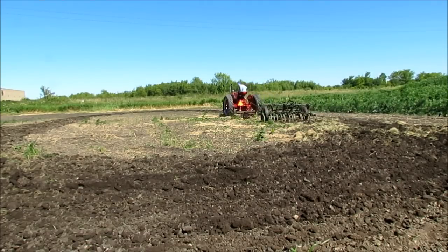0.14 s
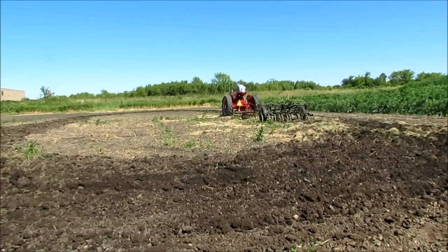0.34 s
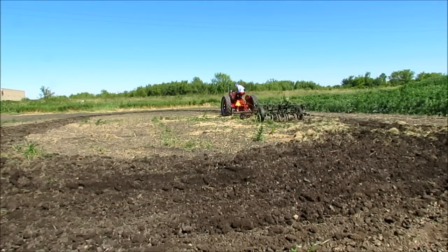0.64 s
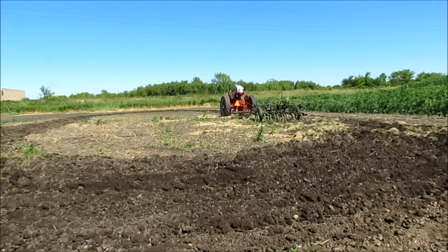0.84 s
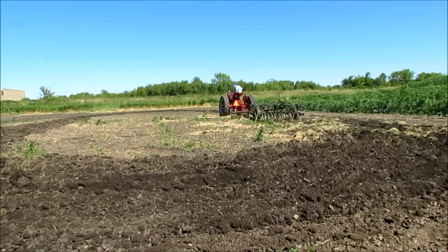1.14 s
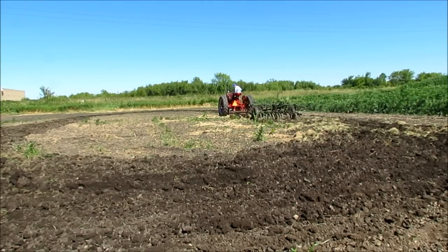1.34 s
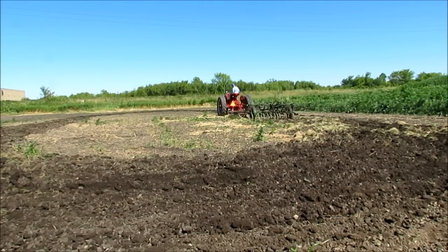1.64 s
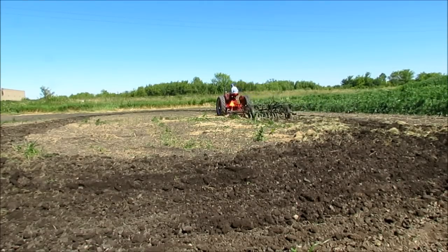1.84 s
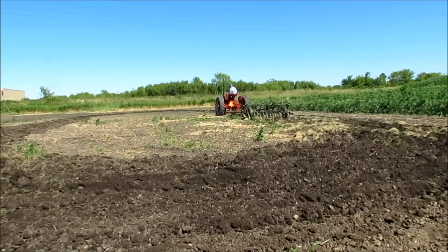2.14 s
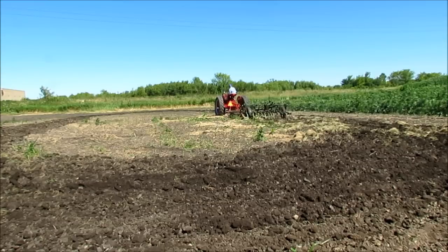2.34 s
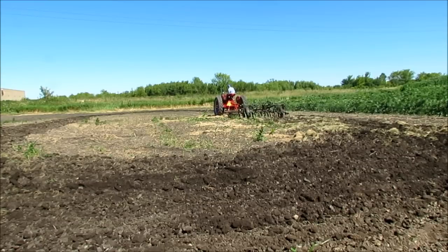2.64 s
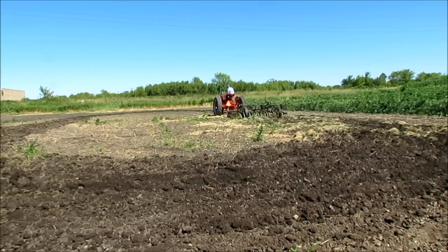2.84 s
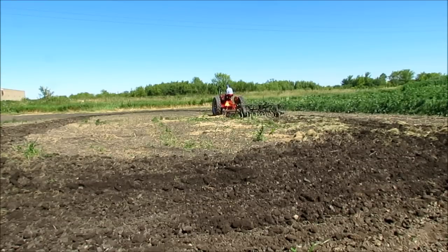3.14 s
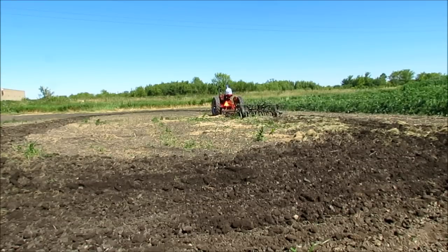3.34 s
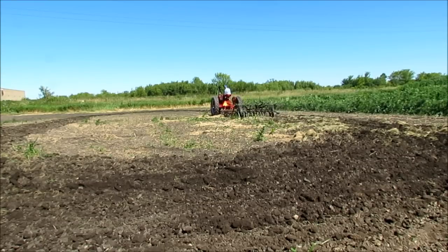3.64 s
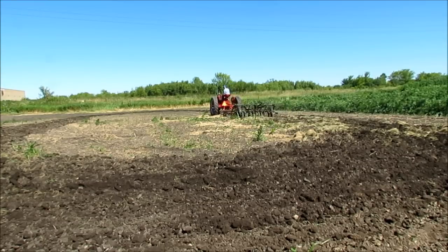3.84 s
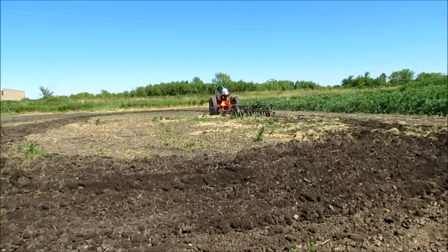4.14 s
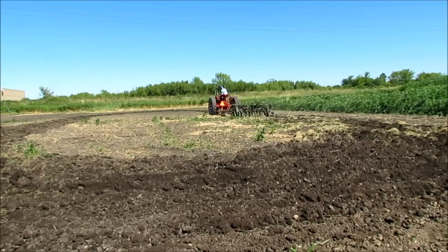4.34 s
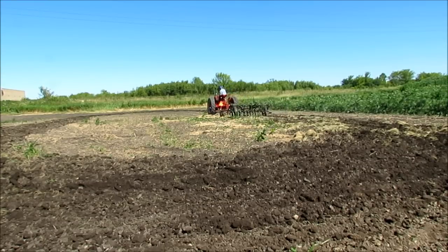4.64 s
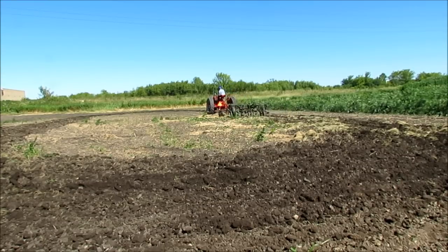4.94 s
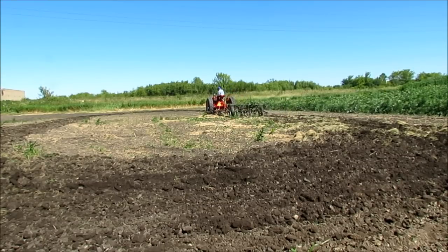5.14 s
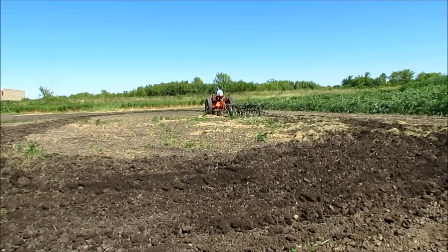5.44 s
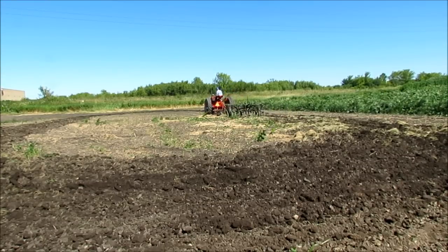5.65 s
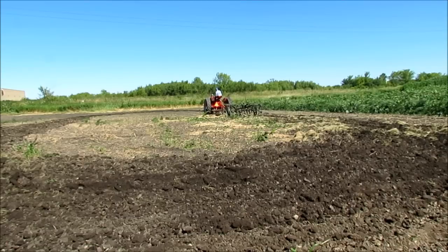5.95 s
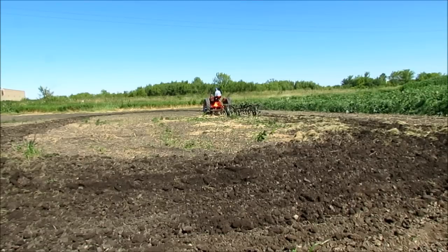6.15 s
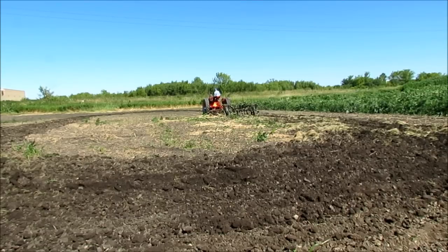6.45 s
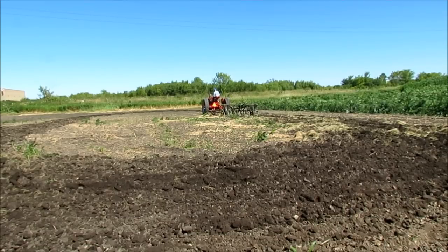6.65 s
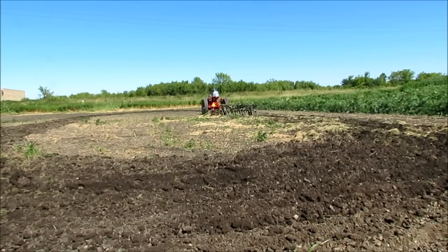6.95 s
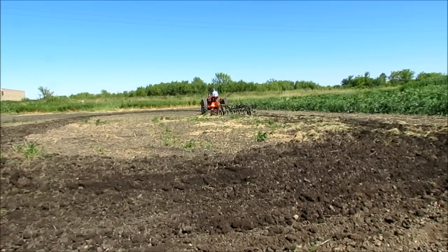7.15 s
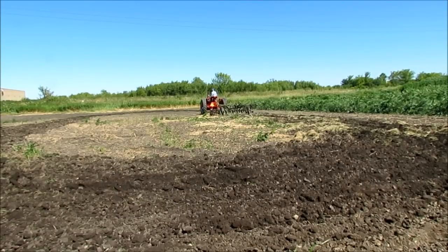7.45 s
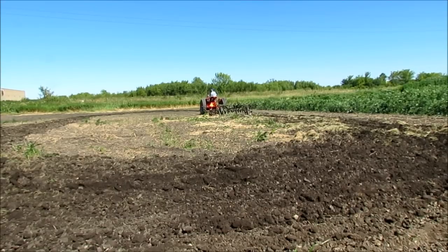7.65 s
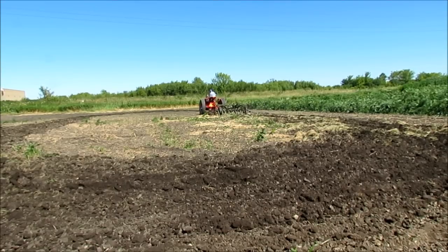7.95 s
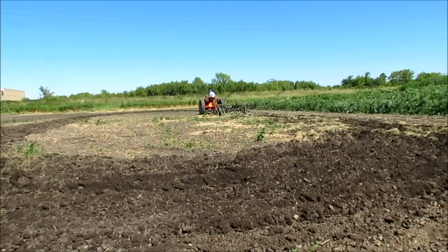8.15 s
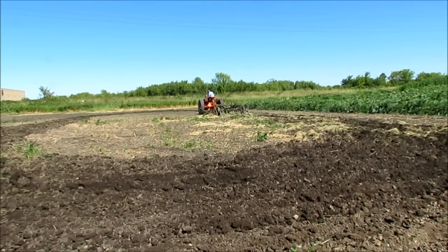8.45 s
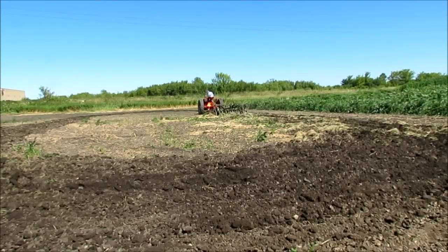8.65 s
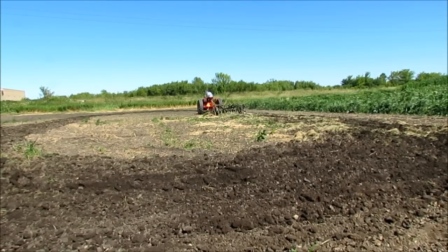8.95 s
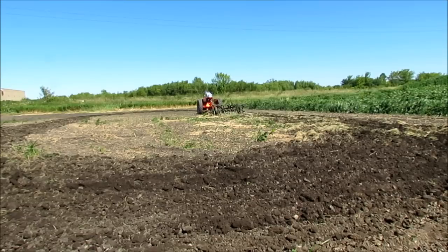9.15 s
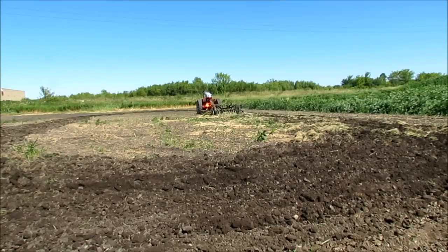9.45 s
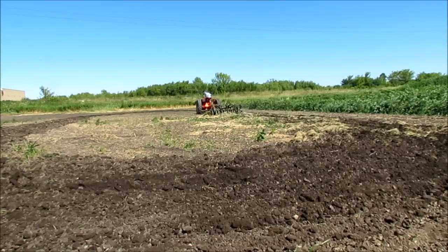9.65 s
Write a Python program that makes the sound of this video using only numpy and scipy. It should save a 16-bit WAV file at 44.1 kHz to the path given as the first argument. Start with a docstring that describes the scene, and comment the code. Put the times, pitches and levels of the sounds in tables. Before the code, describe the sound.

Continuous rapid chug of an old tractor dragging a harrow over soil, heard outdoors from afar. The exhaust is dry, noisy and hissy, slightly uneven from cylinder to cylinder, its pitch wavering a little under the load. Level and brightness flutter with the wind, with a hollow drifting colour. Low wind rumble and lumpy buffets strike the exposed microphone, returning more densely after six seconds.

```python
"""Tractor harrowing a field

An old four-cylinder tractor pulls a harrow across a field, far from a small microphone. Some forty firings
a second each spit a burst of turbulent gas, synthesized as fresh noise rung through an open exhaust stack.
A delayed, inverted copy off the soil combs the blasts with drifting notches. Sines at low orders of the
shaft throb beneath over a soft rumble, and shaped noise in irregular lumps makes gusts buffet the microphone."""
import sys
import numpy as np
from scipy.fft import rfft, irfft, next_fast_len
from scipy.io import wavfile
from scipy.ndimage import uniform_filter1d, map_coordinates

SR = 44100
rng = np.random.default_rng(int(sys.argv[2]) if len(sys.argv) > 2 else 0)


def waveform_to_disk(signal):
    """Save audio, clipped to [-1, 1], as 16-bit WAV at the path in sys.argv[1]."""
    frames = np.transpose(np.atleast_2d(signal))
    scaled = np.clip(frames, -1, 1) * 32767
    samples = np.round(scaled).astype(np.int16)
    wavfile.write(sys.argv[1], SR, samples)


N = 432621
ROW, LEAD = 2048, 512  # samples for one blast, and before its nominal firing time


def amp(db):
    """Decibel law: the amplitude gain of a level in dB."""
    return 10 ** (np.asarray(db) / 20)


def unit(x):
    """Normalization by power: x at rms 1."""
    return x / np.sqrt(np.mean(x ** 2) + 1e-20)


def along(points, hz):
    """Logarithmic frequency scale: (Hz, value) points interpolated on a log axis."""
    f, v = np.transpose(points)
    return np.interp(np.log(hz + 1), np.log(f + 1), v)


def curves(rows, t):
    """Linear interpolation: each column after the time, read at times t."""
    s, *columns = np.transpose(rows)
    return np.array([np.interp(t, s, column) for column in columns])


def wobble(rate):
    """Band-limited chance: a smooth random curve through rate knots a second."""
    knots = rng.standard_normal(int(N * rate / SR) + 4)
    return map_coordinates(knots, [np.arange(N) * rate / SR])


def filtered(x, response):
    """Linear filtering: the spectrum of x times a response of frequency."""
    m = next_fast_len(N + 8192)
    return irfft(rfft(x, m) * response(np.fft.rfftfreq(m, 1 / SR)), m)[..., :N]


def swell(ms, rise_db, fall_db):
    """Exponential growth and decay: climbs rise_db each ms before 0 and sinks fall_db each ms after."""
    before = amp(np.clip(-rise_db * ms, -200, 200))
    after = amp(np.clip(fall_db * ms, -200, 200))
    return 1 / (before + after)


def causal(db):
    """Minimum phase: gains in dB given the phase that rings only after the blow; amp makes them responses."""
    cepstrum = irfft(db)
    fold = 1 + np.sign(ROW // 2 - np.arange(ROW))
    fold[0] = 1
    return rfft(cepstrum * fold)


# engine speed, as the governor hunts under the changing pull: (time [s], firing rate [1/s])
ENGINE_SPEED = [(0.0, 40.81), (0.68, 40.77), (1.15, 39.22), (1.26, 40.05), (2.1, 40.98), (2.2, 40.05),
                (2.95, 39.88), (3.18, 40.71), (3.55, 41.01), (3.75, 40.47), (4.95, 40.72), (4.97, 41.88),
                (5.9, 41.8), (6.2, 40.5), (6.5, 40.96), (7.02, 39.66), (7.26, 39.58), (7.87, 40.75),
                (8.38, 38.98), (8.89, 41.15), (9.26, 39.89), (9.81, 39.35)]


def firings(t):
    """Phase as the integral of rate: firings so far at each sample time t."""
    first_turn = .199  # share of a firing interval already gone at the start
    return first_turn + np.cumsum(curves(ENGINE_SPEED, t)[0]) / SR


# blasts as moving air lets them arrive, before the exhaust's final gain:
# (time [s], bark level [dB], sizzle level [dB])
ARRIVAL_LEVELS = [(0.0, -29, -34), (0.14, -26, -28.5), (0.66, -26.5, -28.5), (0.88, -28.5, -30.5),
                  (1.15, -26, -27.5), (1.75, -26.5, -33.5), (1.88, -28.5, -35.5), (2.02, -25.5, -31.5),
                  (2.57, -27.5, -31.5), (2.72, -33, -40.5), (2.82, -28.5, -28.5), (2.97, -29.5, -35.5),
                  (3.1, -24, -31), (3.34, -28, -35), (3.54, -26.5, -27), (3.81, -26.5, -29.5),
                  (3.98, -34, -36), (4.15, -32.5, -37), (4.3, -29, -28), (4.89, -29, -34.5),
                  (5.04, -26, -26), (5.4, -29.5, -36.5), (5.7, -27.5, -27), (5.82, -31.5, -36),
                  (5.97, -28.5, -31), (6.09, -28, -39.5), (6.21, -24, -27), (6.51, -25, -32.5),
                  (6.72, -26, -28), (6.9, -24, -31), (7.1, -28.5, -32.5), (7.46, -26, -27.5),
                  (7.86, -26.5, -33.5), (7.98, -32, -37), (8.1, -29.5, -28.5), (8.27, -26, -32),
                  (8.48, -22.5, -27.5), (8.73, -28.5, -32.5), (9.1, -30, -34.5), (9.35, -23, -30.5),
                  (9.48, -29, -34.5), (9.7, -25.5, -28.5), (9.81, -27.5, -31)]
# centres of growl, bark and sizzle: (frequency [Hz])
VOICE_CENTRES = [745, 2390, 6850]
# firings that crack out of the row, offsets from the arrival curves before the cylinder trims:
# (time [s], bark offset [dB], sizzle offset [dB], centre of the brightened band [Hz])
CRACKING_FIRINGS = [(0.093, 5.5, 1, 12440), (0.387, 5, 4, 10600), (0.93, 1, -1.5, 5900),
                    (1.08, 0, 1.5, 8500), (1.157, 10, -2, 6950), (1.183, 9, -2, 5930), (1.555, -3, 6, 9600),
                    (1.754, -1, 7, 6900), (2.023, 6, 6, 11800), (2.071, 7, 1, 8100), (2.146, 3, 4.5, 11900),
                    (2.32, 3, 3.5, 6800), (2.619, 7, 0.5, 8000), (2.821, 2.5, 1, 10000),
                    (3.095, -4, 4.5, 11500), (3.512, 6.5, 1, 7400), (3.537, -3, 7, 11380),
                    (3.832, 4.5, 7, 11600), (4.3, 8, -4.5, 12400), (4.424, 4, -1, 8000),
                    (4.498, 1, 4.5, 12400), (4.744, 2, 7, 6200), (5.061, 2, -4, 7950),
                    (5.275, 3, 2.5, 7600), (5.706, 2, 1, 7400), (5.729, -4, 4.5, 4300), (5.992, 7, 4, 5500),
                    (6.385, -2, 4, 4750), (6.41, -2, 1, 8300), (6.704, 0.5, 7, 11200), (6.728, 1, 4, 8250),
                    (6.903, -1, 6.5, 12300), (6.928, 1, 1, 5650), (7.483, -3, 4.5, 9050),
                    (7.68, 8, 0, 8150), (7.706, 3, 3, 7300), (7.73, 1, 4.5, 6070), (7.878, -1, 11.5, 10000),
                    (7.903, -4, 7, 9900), (8.101, 0.9, 1.5, 9900), (8.277, 4.5, -1, 5900),
                    (8.583, -5, 5, 10300), (8.683, -12, 6.5, 10300), (9.35, 2.5, 1, 8050)]


def blast_voices(when, growl_trim_db, sizzle_trim_db, luck, hz):
    """Spectral envelope: each firing's balance of growl, bark and sizzle, in dB over frequency."""
    growl_mean_db, growl_follows = -33, 0.85  # share of the bark's swings that the growl follows
    flicker_db, flicker_rate = (0.2, 1.5), 7  # quicker chance swings of bark and sizzle; knots per s
    s = np.arange(N) / SR
    flicker = [db * np.interp(when, s, wobble(flicker_rate)) for db in flicker_db]
    bark_db, sizzle_db = curves(ARRIVAL_LEVELS, when) + flicker
    growl_db = growl_mean_db + growl_follows * (bark_db - bark_db.mean())
    level_db = np.transpose([growl_db, bark_db, sizzle_db]) + luck * [1.2, .8, 1.2]
    whistle_db = np.zeros((len(when), len(hz)))
    for t, bark_offset_db, sizzle_offset_db, bright_hz in CRACKING_FIRINGS:
        k = np.argmin(abs(when - t))
        level_db[k] = [growl_db[k] - 2, bark_db[k] + bark_offset_db, sizzle_db[k] + sizzle_offset_db]
        whistle_db[k] = 6 * np.exp(-((hz - bright_hz) / 900) ** 2)
    level_db += np.hstack([growl_trim_db, 0 * growl_trim_db, sizzle_trim_db])
    return np.array([along(list(zip(VOICE_CENTRES, row)), hz) for row in level_db]) + whistle_db


# resonances of the exhaust stack: (centre [Hz], width [Hz], relative peak level [dB])
STACK_RESONANCES = [(587, 56, 4.5), (713, 64, -2), (996, 58, -3.5), (1136, 94, 1), (1482, 41, 1),
                    (1744, 105, 4), (2220, 230, -2.5), (2750, 670, 3.5)]
# spectrum of the gas jet, relative, lowered 3 dB in use: (frequency [Hz], level per Hz [dB])
JET_SPECTRUM = [(200, -38), (500, -23), (820, -1.5), (1000, -2.5), (2000, 4.5), (4400, 0), (8700, 0),
                (11200, -7), (14500, -21.5), (16500, -70)]


def stack_and_jet(hz):
    """Resonance: pipe modes ring each blast, and their power adds to that of the broadband jet."""
    pipe = sum(amp(db) * 1j * hz * width / (centre * centre - hz * hz + 1j * hz * width)
               for centre, width, db in STACK_RESONANCES)
    jet = amp(along(JET_SPECTRUM, hz) - 3.0)
    return amp(causal(10 * np.log10(abs(pipe) ** 2 + jet ** 2)))


# the copy off the soil, bent by warm air and wind: (time [s], lag [ms])
SOIL_LAG = [(0.0, .435), (1.75, .445), (2.1, .315), (2.45, .458), (2.8, .478), (3.15, .384), (3.5, .348),
            (3.85, .191), (4.2, .236), (4.72, .247), (5.2, .425), (5.78, .38), (6.12, .25), (6.35, .305),
            (7.05, .278), (7.4, .41), (7.87, .317), (8.4, .138), (8.6, .27), (9.8, .31)]


def soil_reflection(when, hz):
    """Comb interference: soft ground inverts the copy, so notches sit at whole multiples of 1 / lag."""
    lag_ms = curves(SOIL_LAG, when).T
    strength = .68 / (1 + (hz / 5500) ** 2)  # rough soil scatters the treble
    return 1 - strength * np.exp(-2j * np.pi * hz * lag_ms / 1000)


# likeness of the two sides: (frequency [Hz], left-right correlation [1])
SIDE_LIKENESS = [(300, .9), (1400, .92), (3100, .83), (6800, .88), (11000, .95), (15000, .98)]
# balance of the two sides: (frequency [Hz], left over right [dB])
SIDE_BALANCE = [(300, -1.5), (1300, -2.5), (2400, -3), (4400, 1.5), (8000, -1.4), (15000, -1)]


def left_and_right(mid, side, hz):
    """Interaural coherence: two independent noises mixed to a set likeness and balance."""
    turn = np.arccos(np.clip(along(SIDE_LIKENESS, hz), -1, 1)) / 2
    mid, side = mid * np.cos(turn), side * np.sin(turn)
    lean = amp(along(SIDE_BALANCE, hz) / 2)
    return [irfft((mid + side) * lean), irfft((mid - side) / lean)]


# cylinders in firing order: (delay [ms], growl trim [dB], sizzle trim [dB], bark hold [ms])
CYLINDER_TRIMS = [(-3.7, -.4, 2.6, .8), (-2.7, .6, -1.6, 3), (-3.9, -1.8, .6, .5), (-2.7, 1, -1.6, 3)]


def exhaust():
    """Source and filter: one burst of fresh noise per firing, rung by the stack, heard straight and off soil."""
    s = np.arange(N) / SR
    turns = firings(s)
    n = np.arange(int(turns[-1]) + 1)
    when = np.interp(n, turns, s)
    delay_ms, growl_db, sizzle_db, hold_ms = np.array(CYLINDER_TRIMS)[n % len(CYLINDER_TRIMS)].T[..., None]
    hz = np.fft.rfftfreq(ROW, 1 / SR)
    luck = rng.standard_normal((len(n), 5))
    voice_db = blast_voices(when, growl_db, sizzle_db, luck[:, :3], hz)
    # eddies in the jet favour narrow bands, new ones in each blast, more so in the treble
    blotch = causal(unit(uniform_filter1d(rng.standard_normal(voice_db.shape), size=34, axis=1)))
    colour = soil_reflection(when, hz) * stack_and_jet(hz)

    ms = (np.arange(ROW) - LEAD) * 1000 / SR - delay_ms - 0.088 * luck[:, 3:4]
    pace = amp(.7 * luck[:, 4:])  # some bursts, by chance, start and fade faster than others
    # the gas leaves in ragged spurts, each under a millisecond
    spurts = amp(3.2 * unit(uniform_filter1d(rng.standard_normal(ms.shape), size=30, axis=1)))
    onset = spurts * swell(ms * pace, rise_db=10, fall_db=.6)  # the valve opens within two ms
    spit = onset * swell(ms * pace - 3.2, rise_db=0, fall_db=2.6)  # the jet, bright and soon spent
    bark = onset * swell(ms - hold_ms, rise_db=0, fall_db=2.6) * amp(2.5 - hold_ms)  # the pipe's answer
    # the pressure wave runs down the pipe and back: a weaker, duller second puff
    after = amp(-9) * swell(ms - 11, rise_db=3.0, fall_db=4.0)
    hum = amp(-23.0) * np.hanning(ROW)  # steady flow and clatter between firings

    treble = 1 / (1 + (3500 / (hz + 1)) ** 4)
    steady_db = uniform_filter1d(voice_db, size=19, axis=0)  # the flow does not jump with single firings
    parts = [(spit, treble * amp(voice_db + 3.47 * blotch)),
             (bark, (1 - treble) * amp(voice_db + 2.12 * blotch)),
             (after, amp(voice_db) / (1 + hz / 6000)),
             (hum, amp(steady_db) / (1 + hz / 20000))]

    def noise_blasts():
        return sum(rfft(env * rng.standard_normal(ms.shape)) * tint for env, tint in parts) * colour

    mid, side = noise_blasts(), noise_blasts()
    # overlapping blasts add up at their firing times
    at = (np.round(when * SR).astype(int)[:, None] + np.arange(ROW)).ravel()
    pair = left_and_right(mid, side, hz)
    return amp(19.5) * np.array([np.bincount(at, p.ravel(), N + ROW)[LEAD:N + LEAD] for p in pair])


# engine orders, before their wavering and the lean to the right: (multiple of shaft speed [1], rms level [dB])
ENGINE_ORDERS = [(2, -67), (4, -42), (5, -52.5), (6, -53), (8, -57.5), (10, -57.5)]


def throb():
    """Harmonic orders of the shaft, one turn in two firings, roughened by uneven firings; soft rumble below."""
    t = np.arange(N) / SR
    shaft = firings(t) / 2
    tones = 0
    for multiple, db in ENGINE_ORDERS:
        level = np.sqrt(2) * amp(db + 0.23 * multiple * wobble(10))
        tones = tones + level * np.sin(2 * np.pi * multiple * (shaft + 0.125))
    rumble = unit(filtered(rng.standard_normal(N), lambda hz: hz / (150 + hz) / (1 + (hz / 250) ** 2)))
    return (tones + amp(-54.0) * rumble) * amp([[-.7], [.7]])


# gusts that slap the ports: (time when full [s], hold [s], buffet level [dB])
GUST_PEAKS = [(0, 0, -29), (.12, 0.019, -31.5), (.3, 0.071, -37.5), (.64, 0, -24), (.7, .1, -36.5),
              (.97, 0.15, -33.5), (1.33, 0.003, -23), (1.71, 0.0052, -34), (1.79, 0.018, -33),
              (1.94, 0.025, -35.5), (2.76, 0.16, -37), (3.0, .18, -26.5), (3.3, 0.38, -31),
              (3.7, 0.033, -21.5), (4.2, 0.15, -33), (4.4, 0.013, -28.5), (4.61, 0, -34),
              (4.83, 0.013, -36), (4.98, 0.028, -27.5), (5.06, 0.016, -26), (5.16, 0.016, -28.5),
              (5.29, 0, -34), (6.09, 0.063, -29.5), (6.19, 0.012, -23), (6.44, 0.059, -21.5),
              (6.56, 0.07, -24.5), (6.75, 0.094, -28.5), (6.9, 0.008, -25), (7.1, 0.0059, -31),
              (7.66, 0.016, -26.5), (7.82, 0.062, -24), (7.99, 0, -27), (8.09, 0.036, -32),
              (8.18, 0, -21.5), (8.36, 0, -28.5), (8.55, 0.0058, -33), (8.76, 0, -29), (9.03, 0.019, -25.5),
              (9.16, 0.016, -23.5), (9.31, 0, -26), (9.53, .2, -28)]


def gusts(t, lull_db):
    """Attack, hold and decay: the buffet level in dB climbs out of the lull, holds and sinks back."""
    rise_db, fall_db = 0.4, 0.52  # per ms, before and after the hold
    s, held, peak_db = np.transpose(GUST_PEAKS)[..., None]
    coarse = t[::100]
    ms = 1000 * (coarse - s)
    slope_db = np.minimum(rise_db * ms, fall_db * (1000 * abs(held) - ms))
    shape_db = peak_db + np.minimum(0, slope_db)
    return np.maximum(np.interp(t, coarse, shape_db.max(axis=0)), lull_db)


# wind base levels, before chance and gust shifts:
# (time [s], deep rumble level [dB], light buffeting level between gusts [dB])
BREEZE_LEVELS = [(0, -43, -44), (2, -43, -58), (2.6, -45, -47), (3.3, -37, -34), (4.2, -46, -37.5),
                 (5.0, -47, -40), (5.8, -44, -49), (6.5, -38, -37), (7.3, -34.5, -38.5), (7.8, -37, -40),
                 (8.7, -37, -55), (9.81, -37, -34.5)]
# relative spectra of light buffeting, hard buffeting and deep rumble: (frequency [Hz], level per Hz [dB])
LIGHT_SPECTRUM = [(15, -35), (50, -14), (100, -6.5), (230, -2.5), (400, -5), (700, -17), (1500, -72)]
HARD_SPECTRUM = [(60, -28), (250, -8.5), (500, -2), (800, -8), (1300, -23), (2500, -51)]
DEEP_SPECTRUM = [(12, -35), (30, -6), (50, -4), (65, -1), (110, 3.5), (170, -1.5), (300, -25)]


def wind():
    """Turbulent pressure: lumpy eddies strike the ports, higher in hard gusts, weaker and part reversed at right."""
    t = np.arange(N) / SR
    breeze_db, lull_db = curves(BREEZE_LEVELS, t)
    gust_db = gusts(t, lull_db + 4.2 * wobble(13))
    lumps = amp(0.56 * wobble(30) + 4.15 * wobble(250))  # short separate slaps inside slower swells

    def eddies(spectrum):
        return unit(filtered(lumps * rng.standard_normal(N), lambda hz: amp(along(spectrum, hz))))

    def buffet():
        light = amp(gust_db) * eddies(LIGHT_SPECTRUM)
        hard = amp(1.6 * (gust_db + 27.5) - 33) * eddies(HARD_SPECTRUM)  # grows faster than the gust
        return light + hard

    def boom():
        return amp(breeze_db + 0.18 * (gust_db + 25.0) + 2.5) * eddies(DEEP_SPECTRUM)

    near, deep = buffet(), boom()
    left = near + deep
    right = -.5 * near + 0.21 * buffet() - 0.22 * deep + .5 * boom()
    return np.array([left, right])


def scene():
    """Superposition: exhaust, throb and wind add."""
    return exhaust() + throb() + wind()


def record(dry):
    """Saturation and band limit: the loudest peaks are rounded off, and nothing above the limit is kept."""
    top_hz = 15900
    rounded = dry / (1 + abs(dry / .85) ** 4) ** (1 / 4)
    return filtered(rounded, lambda hz: hz < top_hz)


dry = scene()
out = record(dry)
waveform_to_disk(out)
```